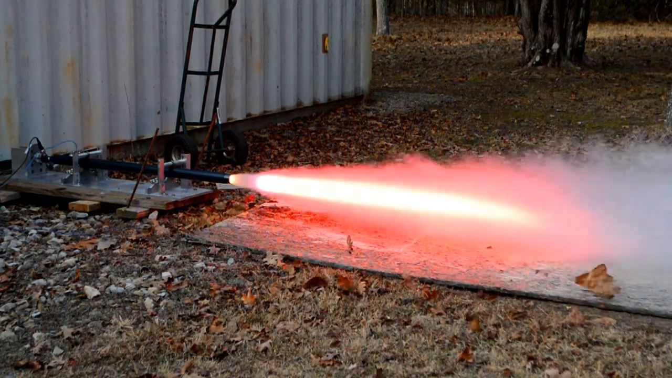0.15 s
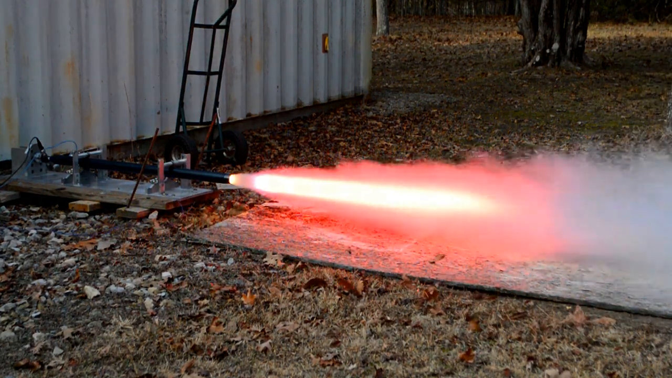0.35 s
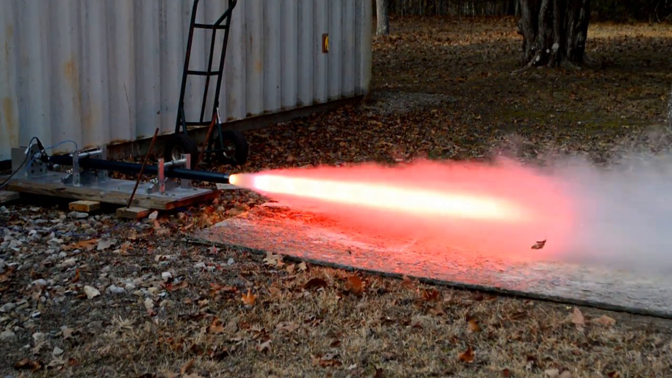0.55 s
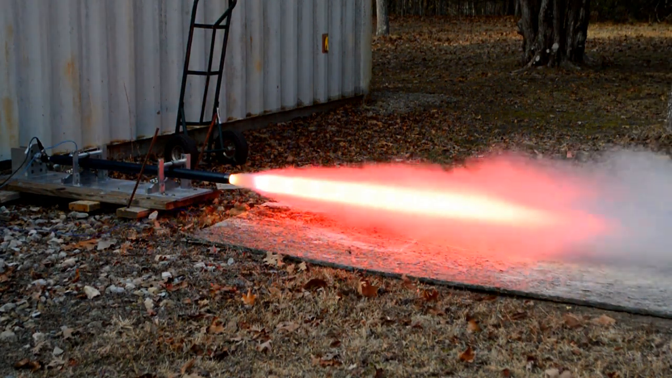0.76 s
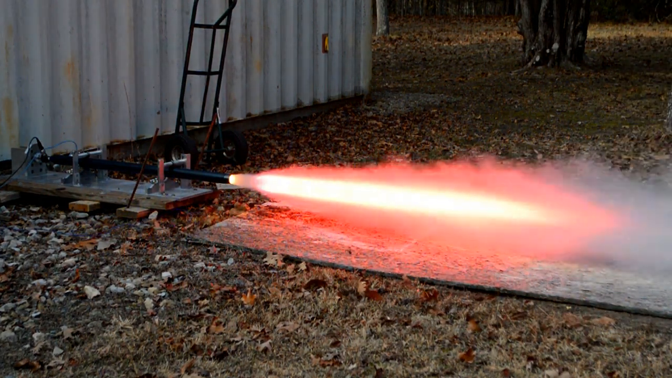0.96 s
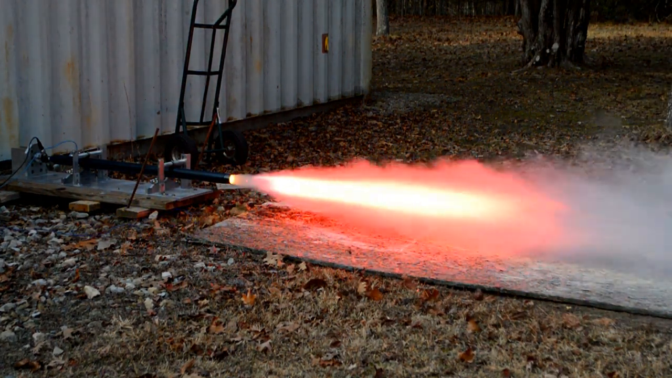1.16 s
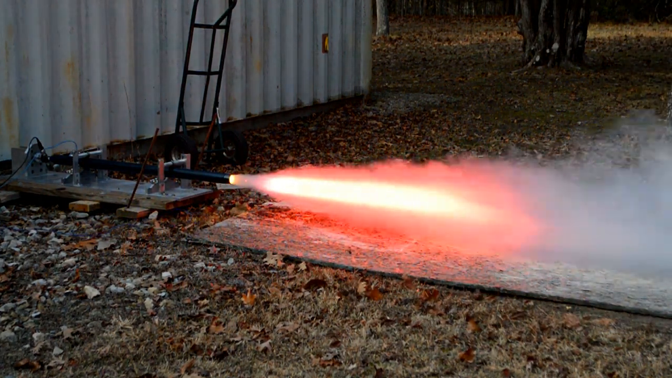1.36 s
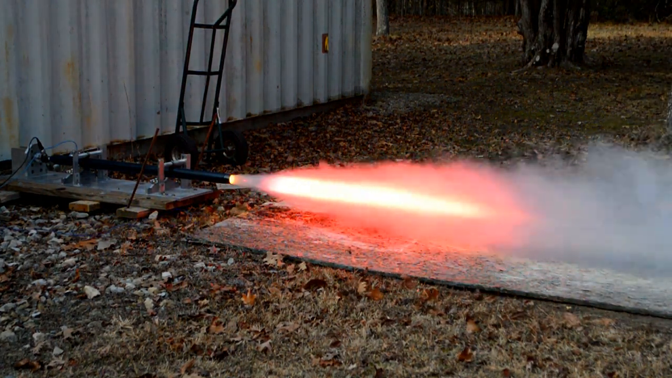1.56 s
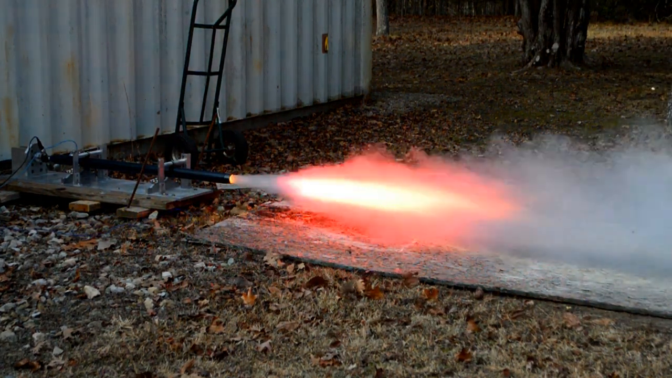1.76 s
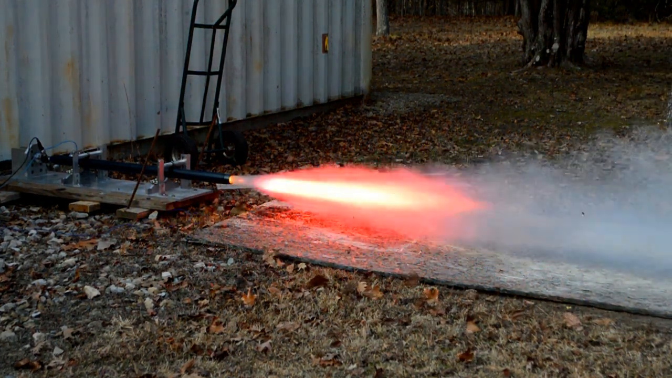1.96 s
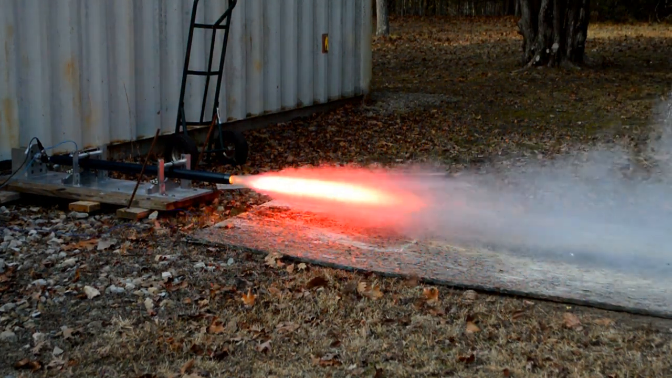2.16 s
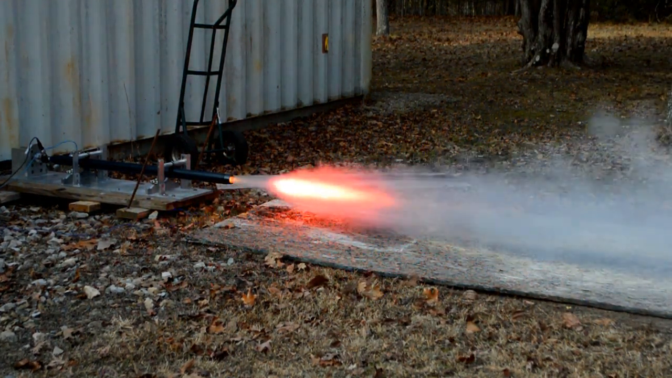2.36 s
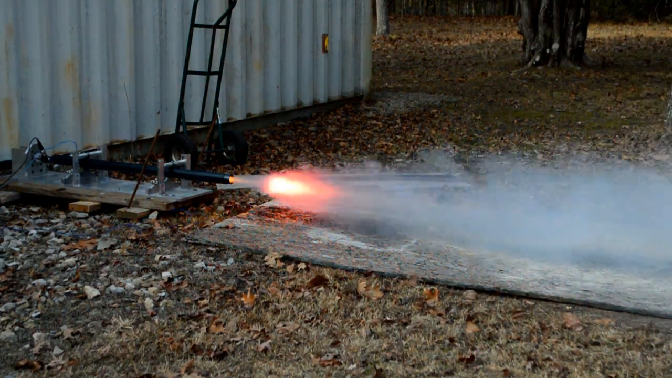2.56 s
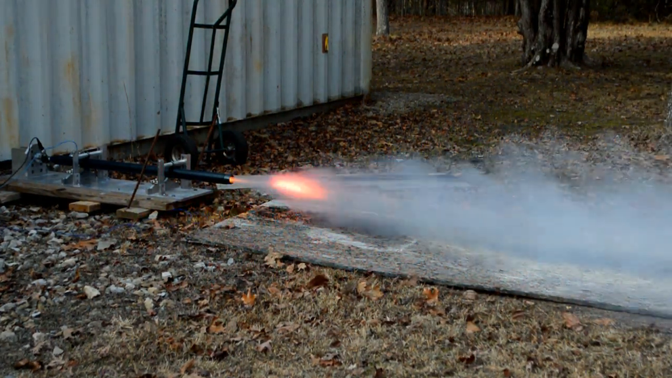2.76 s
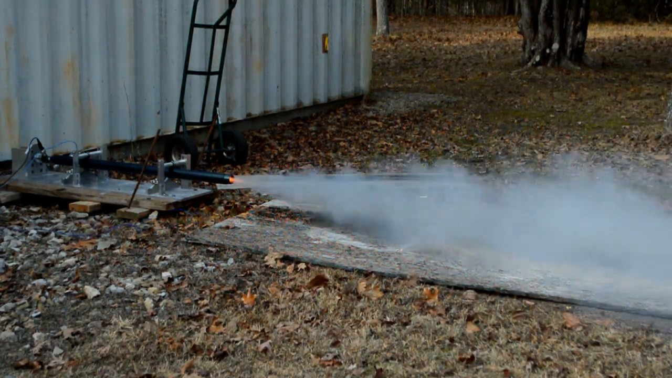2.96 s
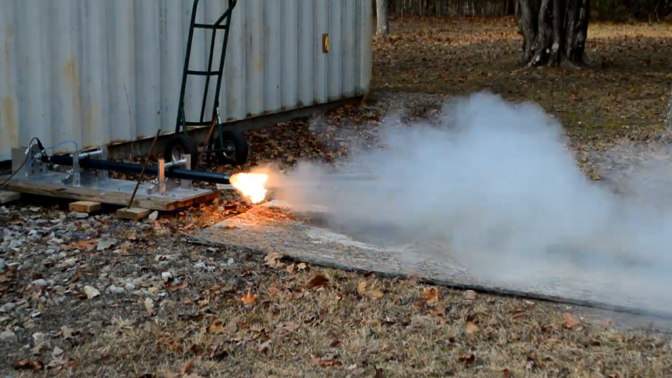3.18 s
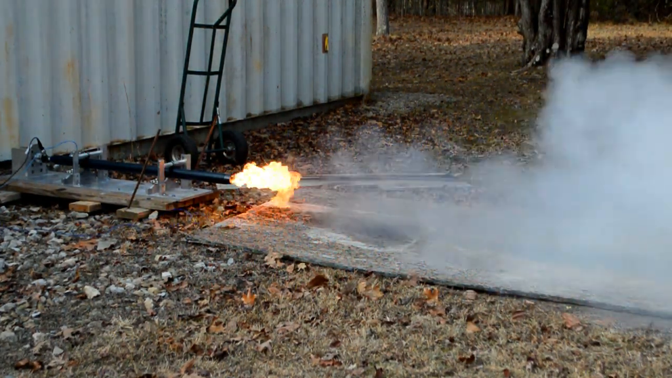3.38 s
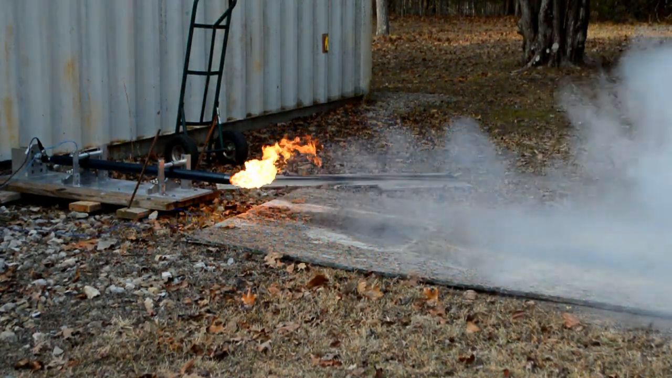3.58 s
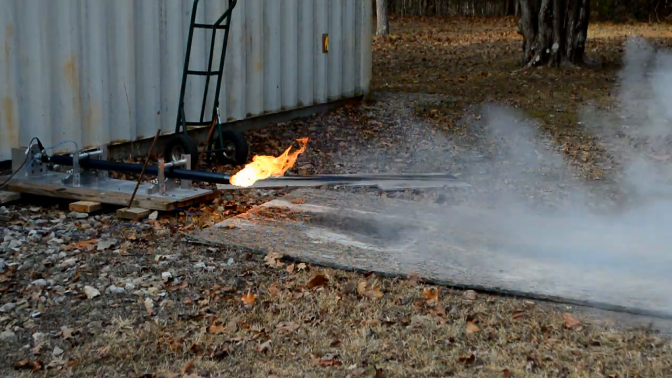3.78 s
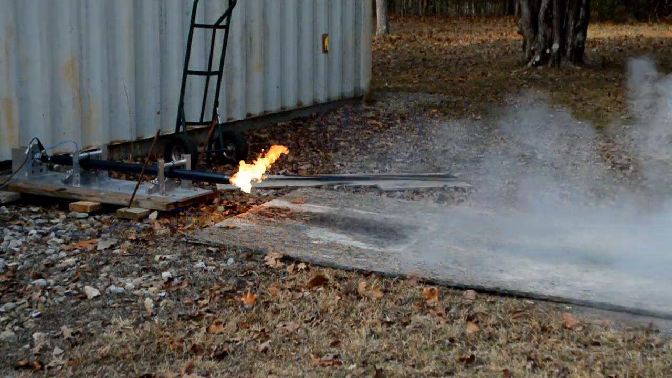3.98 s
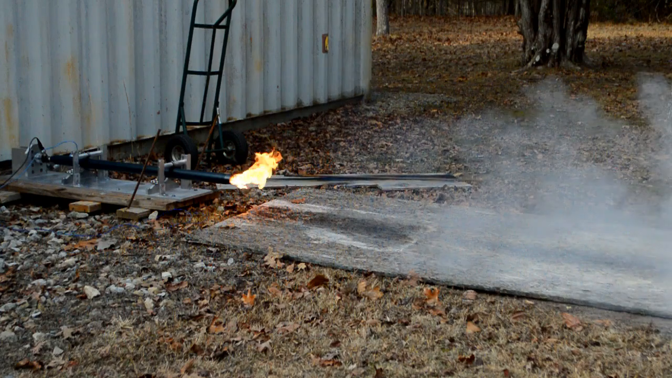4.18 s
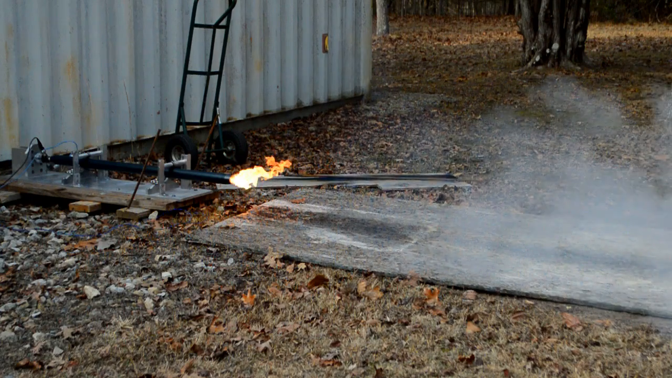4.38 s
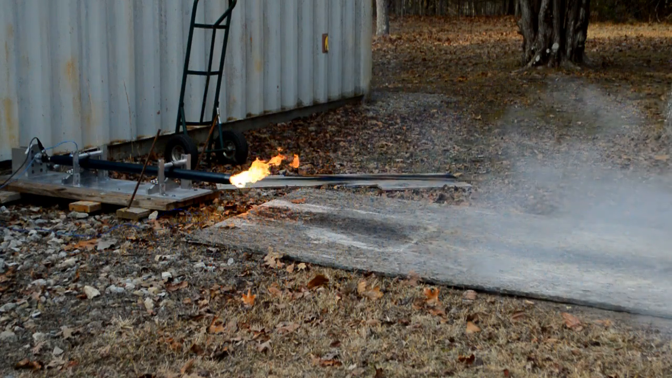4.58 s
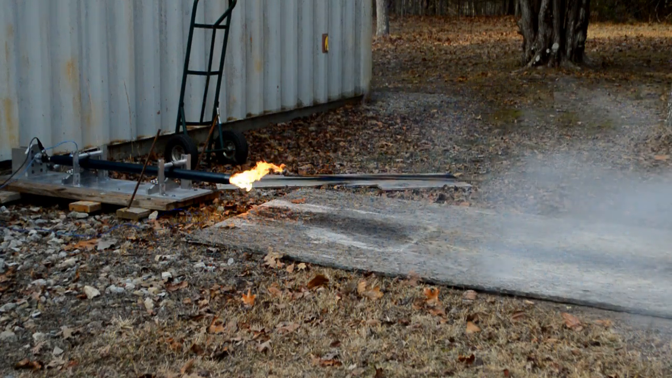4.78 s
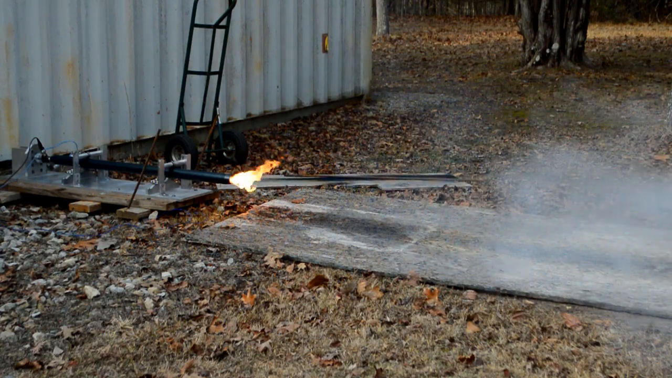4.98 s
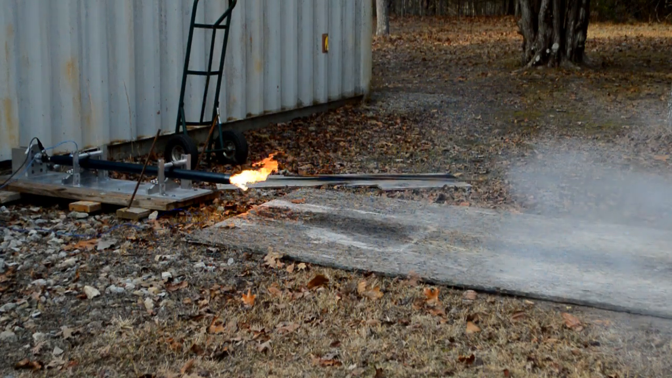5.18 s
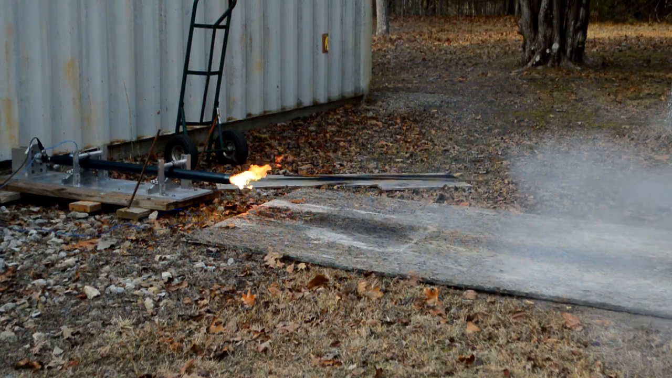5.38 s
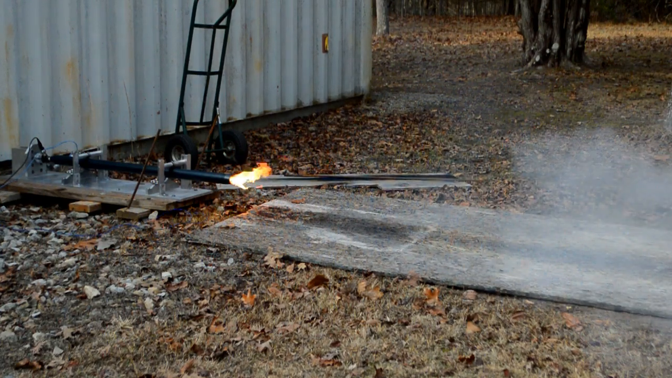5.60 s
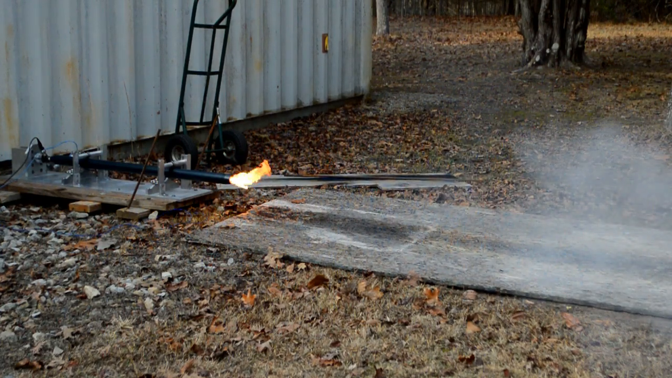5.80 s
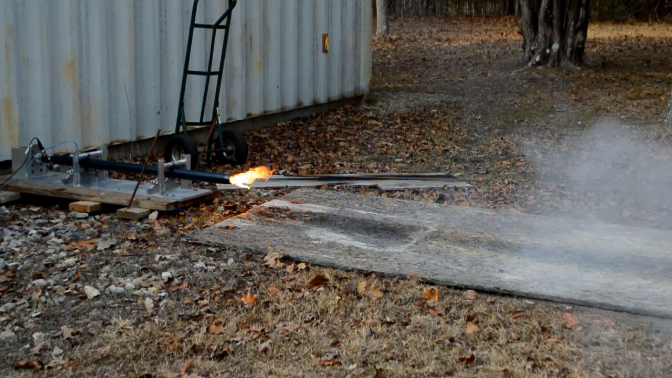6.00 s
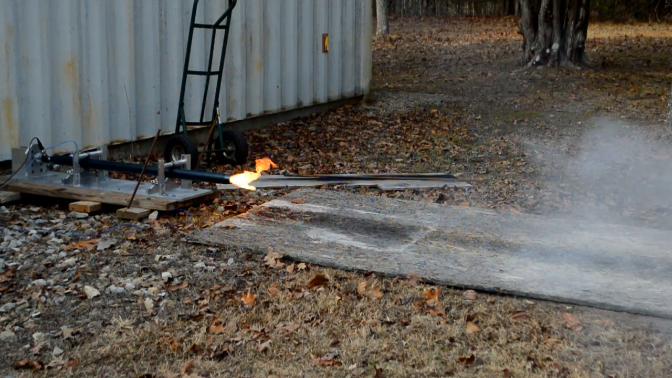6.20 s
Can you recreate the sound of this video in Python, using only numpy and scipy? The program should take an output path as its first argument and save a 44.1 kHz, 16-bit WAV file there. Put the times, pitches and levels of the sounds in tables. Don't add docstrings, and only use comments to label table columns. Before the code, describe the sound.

Loud, bright, clipped jet noise with little deep bass fills the first three seconds and collapses almost at once. The microphone level recovers, lifting the distant rolling rumble, background hiss and a very thin electronic whine. About a second after burnout comes one sharp bang with a short metallic ring, then a low spit, soft flame hiss, tiny ticks and a faint warbling bird among trees.

```python
import sys
import numpy as np
from scipy import signal
from scipy.fft import rfft, irfft
from scipy.io import wavfile

SR = 44100
rng = np.random.default_rng(int(sys.argv[2]) if len(sys.argv) > 2 else 0)


def nominal_scale(level):
    x = np.asarray(level, float) / 20
    return 10 ** x


def put_to_file(sound):
    columns = np.atleast_2d(sound).T
    safe = np.clip(columns, -1, 1)
    whole_steps = np.round(safe * 32767)
    wavfile.write(sys.argv[1], SR, whole_steps.astype(np.int16))


N = 275359
TIME = np.arange(N) / SR
BURNOUT_S = 3.207


def in_time(rows):
    s, *columns = np.transpose(rows)
    return [np.interp(TIME, s, column) for column in columns]


def at_hz(points, hz):
    table_hz, db = np.transpose(points)
    return np.interp(np.log(hz), np.log(table_hz), db)


def rms_one(x):
    return x / np.sqrt(np.mean(x ** 2) + 1e-20)


def drift(rate_hz):
    r = np.exp(-80 * np.pi * rate_hz / SR)
    draws = rng.standard_normal(N // 40 + 2002)
    slow = signal.lfilter([1], [1, -2 * r, r * r], draws)[2000:]
    return np.interp(np.arange(N) / 40, np.arange(len(slow)), rms_one(slow))


def coloured(spectrum):
    hz = np.maximum(np.fft.rfftfreq(N, 1 / SR), 1)
    white = rfft(rng.standard_normal(N))
    return rms_one(irfft(white * nominal_scale(at_hz(spectrum, hz)), N))


def band_pass(x, order, edges_hz):
    return signal.sosfilt(signal.butter(order, edges_hz, "band", fs=SR, output="sos"), x)


def ring(clicks, hz, t60):
    r, w = nominal_scale(-60 / (t60 * SR)), 2 * np.pi * hz / SR
    return signal.lfilter([0, np.sin(w)], [1, -2 * r * np.cos(w), r * r], clicks + 1e-18)


# time in seconds, level in dB above overload.
THRUST = [
    (0, 14.5),
    (1.7, 12),
    (3.15, 10.5),
    (3.175, 3.5),
    (3.204, 0.5),
    (3.224, -18.5),
    (3.245, -27),
    (3.36, -41),
    (3.45, -76),
]
# frequency in Hz, density in dB per Hz.
JET_COLOUR = [(30, -51), (117, -21), (490, -12.5), (1500, -6.5), (2900, -8), (6000, -5), (7500, -4),
              (9300, 2), (10500, -2), (12500, -13.5), (15500, -47.5)]
# frequency in Hz, density in dB per Hz.
DULL_COLOUR = [(40, -12), (200, -3), (800, 1.5), (2000, -9.5), (4500, -0.5), (8000, -17.5)]


def jet(top_db=-6.5, knee=2.2, crackle_db=5.0):
    drive_db, = in_time(THRUST)
    dull_db = np.where(TIME < BURNOUT_S, -2.5 - 0.84 * drive_db, -23.5)
    surges_db = crackle_db * drift(90) * np.clip(drive_db / 12, 0, 1)
    roar = coloured(JET_COLOUR) + nominal_scale(dull_db) * coloured(DULL_COLOUR)
    roar = roar * nominal_scale(drive_db + surges_db)
    squared = nominal_scale(top_db) * roar / (1 + np.abs(roar) ** knee) ** (1 / knee)
    return signal.lfilter([1, -1], [1, -.986], squared)


# time in seconds, gain in dB.
RECOVERY = [
    (3.3, -37.5),
    (3.45, -17.5),
    (3.55, -7.5),
    (3.65, 0.5),
    (3.8, 4),
    (6.24, 0),
]
# frequency in Hz, density in dB per Hz.
HISS = [(25, 0), (80, 8), (300, 6.5), (2000, -12), (3500, -3.5), (7000, -7), (12000, -9), (16000, -6.5)]


def floor(hiss_db=-57, whine_hz=15675, whine_db=-60):
    gain_db, = in_time(RECOVERY)
    whine = nominal_scale(whine_db) * np.sqrt(2) * np.sin(2 * np.pi * whine_hz * TIME)
    return nominal_scale(gain_db) * (nominal_scale(hiss_db) * coloured(HISS) + whine)


# time in
# seconds, centre in Hz.
SPLITS = [(.335, 5700), (.357, 9600), (.357, 11100), (.357, 14000), (.752, 11300), (.752, 4700),
          (.752, 6300), (1.775, 8200), (1.775, 10300), (1.775, 11700), (1.82, 11700), (1.82, 6000),
          (1.911, 12000), (2.145, 10700), (2.145, 6900), (2.585, 7600), (2.75, 14700), (3.1, 13800),
          (3.1, 10400)]


def channel_splits(width_hz=1700, level_db=-19.5, follows=.55):
    frame, grid = 1024, 407
    out, n = np.zeros(N + 2 * frame), np.arange(2 * frame)
    window = np.sin(np.pi * (n + .5) / (2 * frame))
    for (s, hz), noise in zip(SPLITS, rng.standard_normal((len(SPLITS), frame))):
        edges_hz = hz + width_hz * np.array([-.5, .5])
        lines = np.arange(*np.round(edges_hz * 2 * frame / SR).astype(int))
        cosines = np.cos(np.pi / frame * np.outer(n + .5 + frame / 2, lines + .5))
        patch = window * (cosines @ noise[lines])
        start = grid + frame * round((s * SR - grid) / frame - 1)
        out[start:start + 2 * frame] += nominal_scale(level_db + follows * at_hz(JET_COLOUR, hz)) * rms_one(patch)
    return out[:N]


# frequency in Hz, density in dB per Hz.
ROLL = [(65, -73), (140, -60.5), (500, -64.5), (1500, -69), (2300, -77), (4500, -86), (10000, -112),
        (11800, -165)]
# frequency in Hz, loss in dB per tenfold delay.
ROLL_SPREAD = [(200, 8.5), (900, 17.5), (1600, 18), (2400, 35), (4500, 44), (10000, 24), (12000, 45)]
# frequency in Hz, loss in dB per second.
ROLL_FADE = [(200, 4), (900, 3), (1600, 6), (2400, -1), (3300, 4), (4500, 3.8), (10000, 43), (12000, 68)]


def roll(lumps_db=0.83, slow_db=-0.05, own_db=1.0, nearest_s=0.085, top_hz=10260):
    white, (gain_db,) = rng.standard_normal((2, N)), in_time(RECOVERY)
    lumps = lumps_db * drift(25) + slow_db * drift(9.8)
    lumps = lumps * np.clip((TIME - 3.55) / 0.59, .3, 1)
    delay = np.maximum(TIME - BURNOUT_S, nearest_s)
    edges = 22 * 2 ** np.arange(0, 9.7, 1 / 3)
    out = 0
    for k, (low, high) in enumerate(zip(edges, edges[1:])):
        hz = np.sqrt(low * high)
        level_db = at_hz(ROLL, hz) - at_hz(ROLL_SPREAD, hz) * np.log10(delay)
        level_db = level_db - at_hz(ROLL_FADE, hz) * (delay - 1)
        band = band_pass(white[k % 2], 2, [low, high])
        out = out + band * nominal_scale(level_db + gain_db + lumps + own_db * drift(10))
    out = signal.sosfilt(signal.butter(6, top_hz, fs=SR, output="sos"), out)
    return out * np.sqrt(SR / 2) * (TIME > BURNOUT_S)


# start in seconds, peak in dB, centre in Hz.
SPITS = [
    (3.22, -27, 90),
    (3.236, -23, 300),
    (4.33, -14, 600),
    (4.387, -28, 4500),
    (4.482, -47.5, 11900),
    (5.002, -33, 11080),
    (5.09, -33, 1900),
    (5.104, -42, 4000),
    (5.59, -38, 10500),
]


def spits(octaves=1.1, rise_s=.002):
    out, age = np.zeros(N), np.arange(4000) / SR
    for (s, db, hz), noise in zip(SPITS, rng.standard_normal((len(SPITS), 4000))):
        edges_hz = [hz / 2 ** (octaves / 2), min(hz * 2 ** (octaves / 2), .45 * SR)]
        burst = rms_one(band_pass(noise, 4, edges_hz))
        t60 = 0.044 + 3.2 / hz
        start = round(s * SR)
        out[start:start + 4000] += nominal_scale(db - 8 - 60 * age / t60) * (1 - np.exp(-age / rise_s)) * burst
    return out


# start in seconds, peak in dB.
PUFFS = [
    (3.869, -28),
    (4.03, -33),
    (4.387, -42),
    (4.48, -36),
    (4.731, -44),
    (4.774, -39.5),
    (5.104, -37.5),
    (5.2, -51),
]
# frequency in Hz, density in dB per Hz.
FLAME_COLOUR = [(1500, -2.5), (3000, -0.5), (4500, 5), (6800, -7), (9000, 4), (10500, -5), (13000, -40),
                (16000, -13)]


def flame(sputter_db=1.8, offset_db=2.5, lit_s=4, lit_db=-48, puff_t60_s=.07):
    age = TIME - lit_s
    swell_db = np.minimum(73 * age, -8 * age)
    level = nominal_scale(lit_db + offset_db + swell_db + sputter_db * drift(20))
    for s, db in PUFFS:
        level = level + nominal_scale(db - 9.5 - 60 * np.abs(TIME - s) / puff_t60_s) * (TIME > s)
    return coloured(FLAME_COLOUR) * level * (TIME > BURNOUT_S)


# start in seconds, level in dB, pitch in Hz, t60 in seconds.
POP = [
    (4.1913, -3, 1200, .005),
    (4.1947, -1, 1000, .004),
    (4.1918, -12, 8800, .005),
    (4.1918, -15, 5200, .005),
    (4.1985, -15, 3350, .022),
    (4.198, -26, 6800, .02),
    (4.2, -24, 4800, .015),
    (4.192, -22, 2850, .03),
]
# start in seconds, level in dB, pitch in Hz, t60 in seconds.
CASING = [(4.1935, -15, 303, .125), (4.1968, -13, 303, .125), (4.1913, -13, 1152, .03),
          (4.19478, -13, 1152, .11), (4.2, -23, 2285, .14), (4.1968, -22, 325, .07),
          (4.1948, -22, 1205, .16), (4.199, -22, 2350, .04), (4.194, -24, 2120, .05),
          (4.1945, -24, 108, .1), (4.1945, -15, 522, .05), (4.1945, -22, 780, .05), (4.1945, -24, 930, .14),
          (4.197, -28, 1800, .04)]


def pop(tail_db=-17.5, tail_t60=0.055):
    age = TIME - POP[0][0]
    scatter = band_pass(rng.standard_normal(N), 1, [500, 5000])
    out = scatter * nominal_scale(tail_db - 60 * np.abs(age) / tail_t60) * (age > 0)
    for s, db, hz, t60 in POP + CASING:
        click = nominal_scale(db) * (np.arange(N) == round(s * SR))
        out -= ring(click, hz, t60)
    return signal.sosfilt(signal.butter(2, 90, "high", fs=SR, output="sos"), out)


def bird(warble_hz=120.0, wobble=.25, early_db=5.5, early_t60=0.089, late_db=-6.0, late_t60=0.45):
    start_s, length_s, call_db, attack_s, release_s = 5.912, .222, -37.5, 0.027, 0.046
    since = np.clip(TIME - start_s, 0, length_s)
    low = 7500 + 2530 * np.exp(-since / 0.016) + 850 * (since / length_s) ** 3.5
    span = 9800 - 1150 * np.exp(-((since - .07) / .04) ** 4) - low
    level = np.clip(np.minimum(since / attack_s, (length_s - since) / release_s), 0, 1) ** .9
    cycle = 2 * np.pi * np.cumsum(warble_hz * (1 + wobble * drift(30))) / SR
    height = (1 - np.cos(cycle)) / 2
    phase = 2 * np.pi * np.cumsum(low + span * height) / SR
    voice = level * nominal_scale(call_db - 24.0 * (height - .25) ** 2) * np.sin(phase)
    age, leaves = np.arange(SR // 2) / SR, rng.standard_normal((2, SR // 2))
    early = leaves[0] * nominal_scale(-60 * age / early_t60)
    late = leaves[1] * nominal_scale(-60 * age / late_t60)
    echoes = nominal_scale(early_db) * early / np.linalg.norm(early) + nominal_scale(late_db) * late / np.linalg.norm(late)
    return 0.54 * voice + signal.fftconvolve(voice, echoes)[:N]


def scene():
    mono = jet() + floor() + roll() + spits() + flame() + pop() + bird()
    return np.tile(mono, (2, 1))


def band_limit(x):
    return signal.sosfilt(signal.butter(12, 15760, fs=SR, output="sos"), x)


def record(dry):
    x = signal.sosfilt(signal.butter(2, 50, "high", fs=SR, output="sos"), dry)
    x = signal.sosfilt(signal.cheby2(14, 50, 16300, fs=SR, output="sos"), x)
    x = np.clip(x, -1, 1) + channel_splits() * [[1], [-1]]
    return band_limit(x)


dry = scene()
out = record(dry)
put_to_file(out)
```